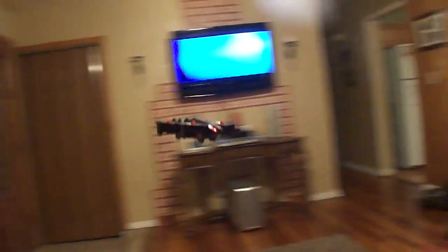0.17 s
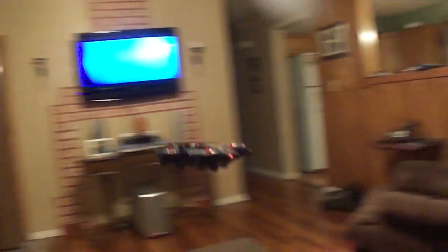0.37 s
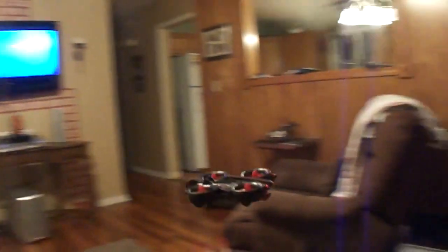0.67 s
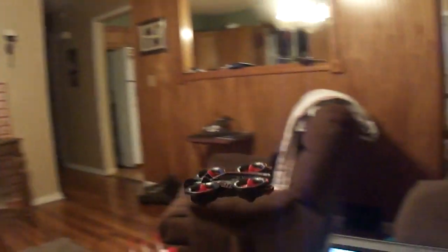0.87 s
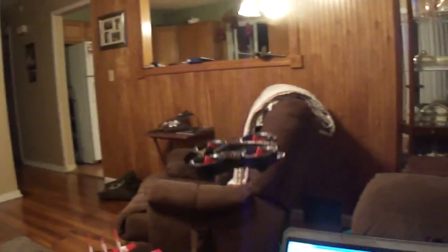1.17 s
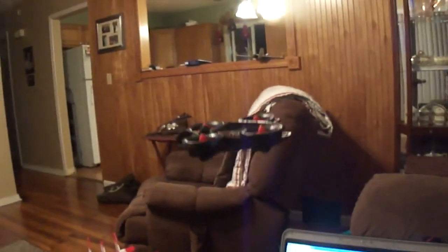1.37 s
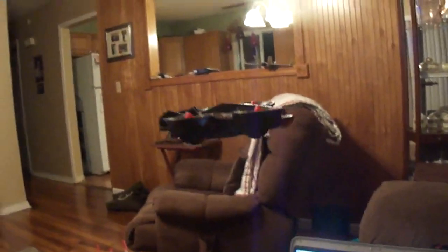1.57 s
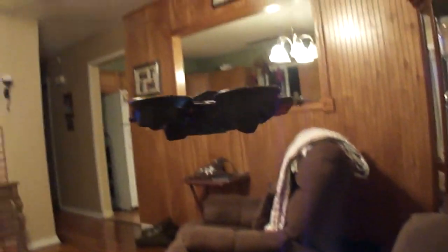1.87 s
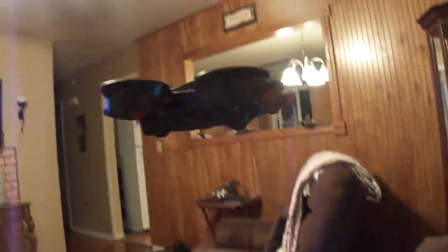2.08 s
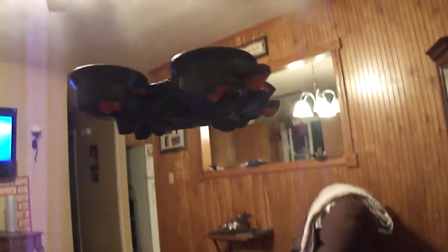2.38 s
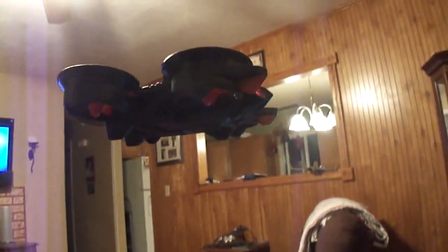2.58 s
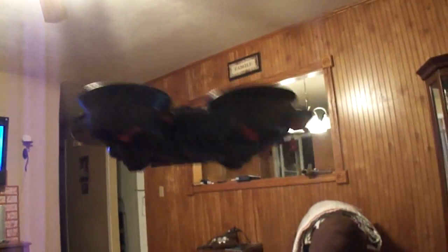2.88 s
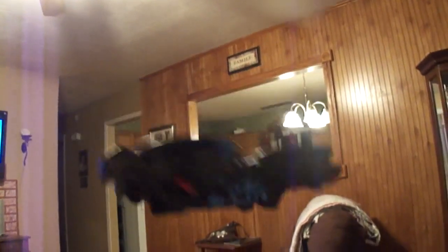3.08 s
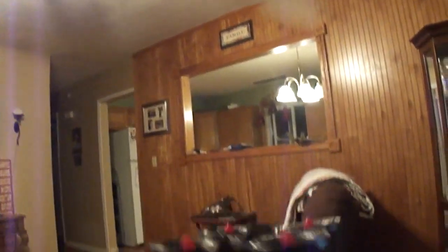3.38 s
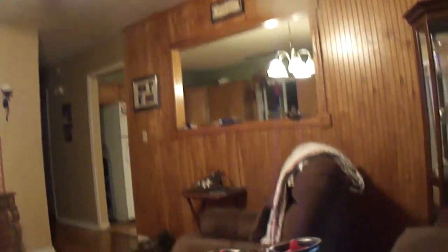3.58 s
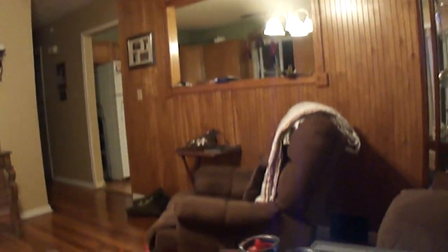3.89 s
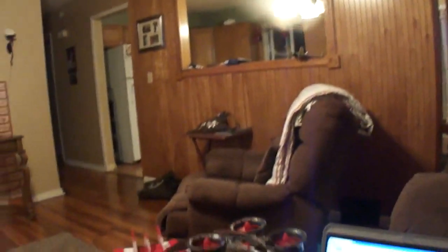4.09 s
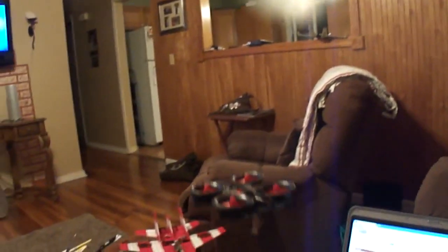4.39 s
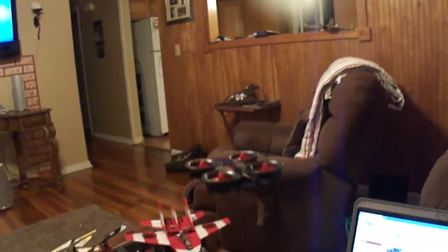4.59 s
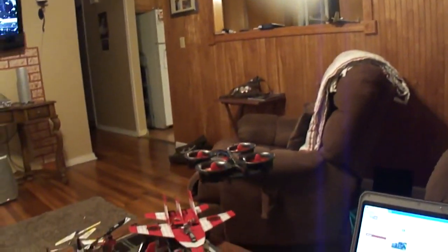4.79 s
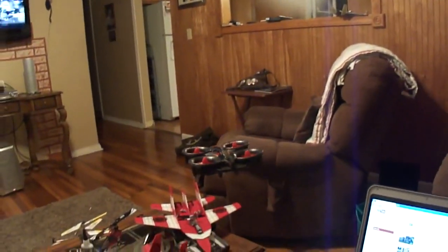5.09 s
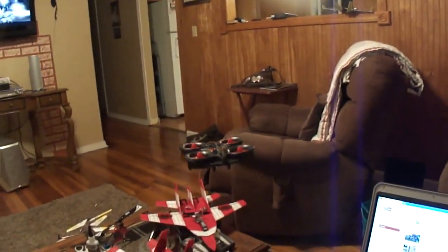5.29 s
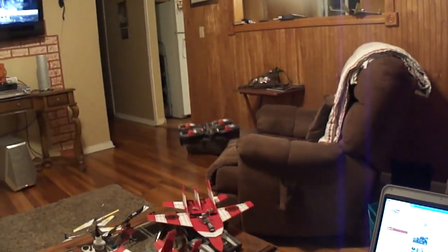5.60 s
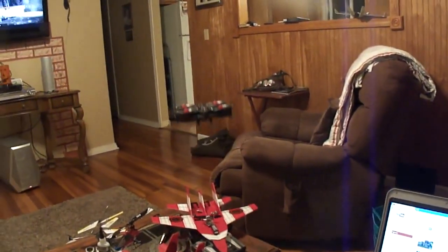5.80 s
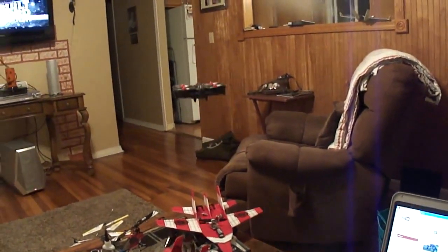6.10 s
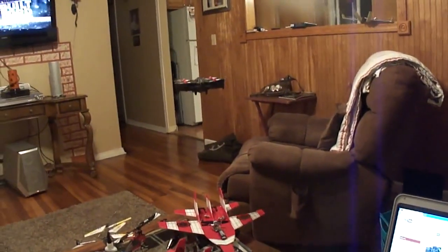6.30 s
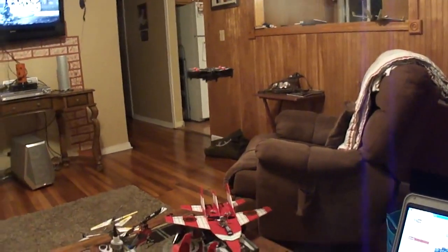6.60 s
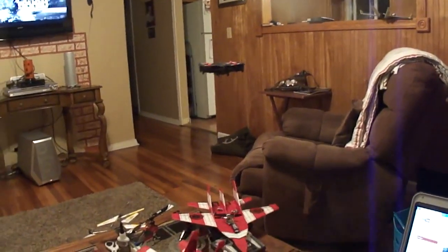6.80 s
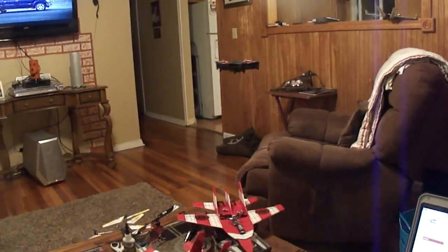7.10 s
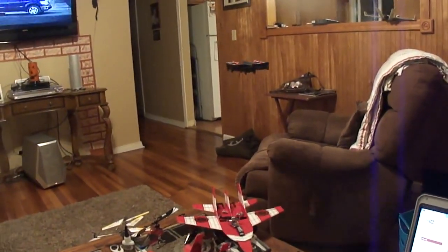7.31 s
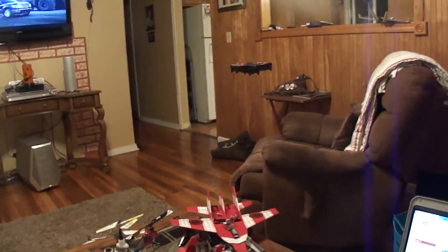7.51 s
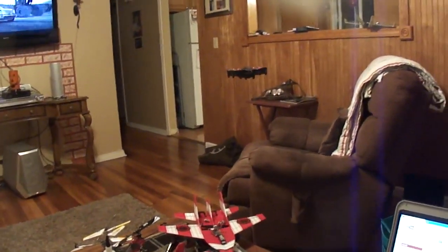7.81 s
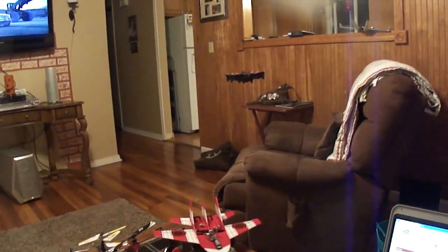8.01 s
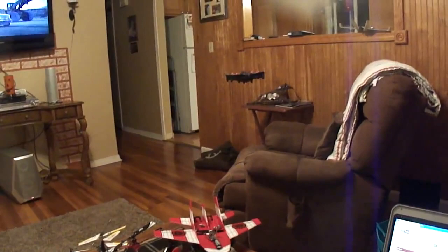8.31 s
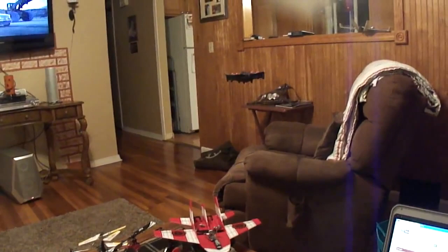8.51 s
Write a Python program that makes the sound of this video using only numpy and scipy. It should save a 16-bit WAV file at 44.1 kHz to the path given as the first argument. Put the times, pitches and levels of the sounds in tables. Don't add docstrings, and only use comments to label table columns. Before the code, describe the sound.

A small ducted quadcopter buzzes continuously through a furnished living room, already flying at the start. The sound is a dense, raspy, nasal drone with rough beating, airy propeller hiss, a hollow ringing from the ducts and a thin, fixed high motor whine. From 0 to 0.5 s the pitch dips, then rises by 0.7 s and wavers until 2.6 s. Around 2.7 to 3 s one rotor pair strains sharply upward while the other sags, then they recover. At 3.9 to 4.2 s both surge together, followed by wobbling corrections. From about 6 s it settles into a steadier, slightly more distant hover with small flutters and a little more faint low rumble. At 8.1 s the buzz abruptly softens behind a door edge, with a faint low panel hum, and continues to the end at about 8.6 s. Small camera microphone, short room reverberation, muted extreme treble, almost mono.

```python
import sys
import numpy as np
from scipy import signal
from scipy.fft import rfft, irfft, next_fast_len
from scipy.io import wavfile

SR = 44100
rng = np.random.default_rng(int(sys.argv[2]) if len(sys.argv) > 2 else 0)


def put_to_file(sound):
    columns = np.atleast_2d(sound).T
    safe = np.clip(columns, -1, 1)
    whole_steps = np.round(safe * 32767)
    wavfile.write(sys.argv[1], SR, whole_steps.astype(np.int16))


def makeup_ratio(level_db):
    decades = np.asarray(level_db, float) / 20
    return 10 ** decades


N = 381465


def rms_one(x):
    return x / np.sqrt(np.mean(x ** 2) + 1e-20)


def in_time(rows):
    s, *columns = np.transpose(rows)
    return [np.interp(np.arange(N) / SR, s, c) for c in columns]


def at_frequency(hz, rows):
    points = np.array(rows)
    return np.interp(np.log(hz), np.log(points[:, 0]), points[:, 1])


def drift(rate):
    r = np.exp(-80 * np.pi * rate / SR)
    noise = rng.standard_normal(N // 40 + 2002)
    slow = signal.lfilter([1], [1, -2 * r, r * r], noise)[2000:]
    return np.interp(np.arange(N) / 40, np.arange(len(slow)), rms_one(slow))


def turns(hz):
    return 2 * np.pi * (np.cumsum(hz) / SR + rng.random())


def tone(phase):
    return np.sqrt(2) * np.sin(phase)


def band_pass(x, order, low_hz, high_hz):
    return signal.sosfilt(signal.butter(order, [low_hz, high_hz], "band", fs=SR, output="sos"), x)


def resonance(x, hz, width_hz):
    r = np.exp(-np.pi * width_hz / SR)
    poles = [1, -2 * r * np.cos(2 * np.pi * hz / SR), r * r]
    once = signal.lfilter([1, 0, -1], poles, x)
    return rms_one(signal.lfilter([1, 0, -1], poles, once))


# (multiple of shaft speed [1], level [dB])
BLADE_ORDERS = [(2, -18.5), (4, -13.5), (5, -13), (6, -10), (7, -16), (8, -16.5), (9, -9), (10, -24.5),
                (11, -25.5), (12, -11), (14, -42), (15, -10), (17, -26), (18, -14), (21, -16), (24, -15.5),
                (27, -20.5)]
STRAIN_ORDERS = (5, 7, 12, 18)
STRAIN_FROM_HZ, STRAIN_DB_PER_OCTAVE = 370, 80


def rotor(hz, trim, shaft_db, blade_db, buzz_db, top_db):
    steady = turns(hz * (1 + trim + 0.0028 * drift(12)))
    shake = turns(hz * 0.0072 * drift(44.67))
    shaft = makeup_ratio(shaft_db + 1.5 * drift(12)) * tone(steady + 0.34 * shake)
    blade = makeup_ratio(blade_db + 2 * drift(25)) * tone(3 * (steady + 0.5 * shake))
    octaves_over = np.maximum(np.log2(hz * (1 + trim) / STRAIN_FROM_HZ), 0)
    strain = makeup_ratio(STRAIN_DB_PER_OCTAVE * octaves_over)
    gusts = [makeup_ratio(buzz_db + 4 * drift(70) + 2.5 * drift(1.5)) for _ in range(6)]
    buzz = 0
    for n, (order, db) in enumerate(BLADE_ORDERS):
        gain = makeup_ratio(db)
        if order > 11:
            gain = gain * makeup_ratio(top_db + 11)
        elif order == 2:
            gain = gain * (hz / 350) ** 6.4
        if order in STRAIN_ORDERS:
            gain = gain * strain
        phase = order * (steady + shake) + 2 * np.pi * rng.random()
        buzz = buzz + gain * gusts[n % 6] * tone(phase)
    return buzz, shaft + blade, steady


TWIN_SHAFT_DB, TWIN_BLADE_DB, TWIN_DB_PER_SPLIT = -13, -11, 2.5


def rotor_pair(hz, split, blade_db, shaft_db, buzz_db, top_db):
    buzz_db = buzz_db + 30 * np.log10(hz / 335)
    apart_db = TWIN_DB_PER_SPLIT * abs(split)
    twin_shaft_db = shaft_db + np.minimum(TWIN_SHAFT_DB + apart_db, -2)
    twin_blade_db = blade_db + np.minimum(TWIN_BLADE_DB + apart_db, -7)
    half_split = split / 200
    buzz, tones, phase = rotor(hz, 0.99 * half_split, shaft_db + 0.35, blade_db - 3, buzz_db, top_db)
    twin_buzz, twin_tones, _ = rotor(hz, -half_split, twin_shaft_db, twin_blade_db, buzz_db, top_db)
    return buzz + twin_buzz, tones + twin_tones, phase


# (time [s], shaft speed [Hz],
# split between its rotors [%], blade load [dB], shaft unbalance [dB])
FAST_PAIR = [(0, 345.3, 0.88, -21.5, -34.5), (.22, 333.4, 1.48, -22, -38.5), (.35, 344.5, 1.89, -24, -44),
             (.46, 335, 1.29, -28, -38.5), (.57, 348, 1.25, -26, -35.5), (.67, 366.2, 0.095, -15, -24),
             (.8, 364.4, .1, -17, -29.5), (.97, 371, 2.42, -17.5, -33), (1.16, 366, 3.63, -19.5, -29.5),
             (1.27, 353, 2.08, -28.5, -34), (1.36, 341.7, 1.48, -27, -37.5), (1.75, 347, 1.98, -26, -35),
             (2.0, 341.6, 2.42, -30, -40), (2.3, 339.6, 2.47, -31, -38.5),
             (2.58, 338.4, 2.46, -32.5, -38.5), (2.7, 367.3, 1, -20.5, -32), (2.8, 379.2, 1.08, -23, -26.5),
             (2.87, 389.7, 0.99, -26, -28), (2.93, 401, 0.98, -27.5, -32.5), (3.08, 373, 1.48, -27, -34),
             (3.3, 359.3, 1.06, -24.5, -48), (3.52, 367.8, 0.97, -20.5, -43),
             (3.76, 366.8, 0.97, -28.5, -39), (3.86, 380.6, 0.47, -21, -28.5),
             (4.0, 381.5, 0.515, -16, -31), (4.08, 374.8, 2.03, -23, -31), (4.2, 369.4, 2, -25.5, -22.5),
             (4.32, 363.6, 0.95, -21.5, -38), (4.43, 381, 5.8, -20.5, -36.5),
             (4.7, 372.5, 4.3, -21.5, -37.5), (4.9, 364.5, .6, -19.5, -39.5), (5.02, 367, 1.02, -25, -30),
             (5.17, 358.5, .5, -18, -34), (5.55, 361, .8, -26.5, -31.5), (5.7, 350, 1.68, -29, -35.5),
             (5.82, 344.4, 1.01, -27.5, -32), (5.93, 339.1, 1.47, -30, -39),
             (6.05, 332.9, 1.01, -32, -44), (6.8, 332, 0.59, -35, -45.5), (6.9, 332.6, .4, -24, -38),
              (6.98, 332.6, 0.41, -21, -37), (7.06, 332.7, 0.99, -41, -44), (7.14, 333, .4, -18.5, -49),
              (7.2, 333, 0.597, -36, -53), (7.27, 333.6, 0.41, -14.5, -41), (7.34, 333.5, 0.61, -26.5, -34),
              (7.4, 333, 0.64, -24, -44), (7.49, 333, 0.62, -20.5, -46), (7.56, 333, 1.04, -27, -42),
              (7.77, 336, 1.01, -24.5, -45), (7.95, 339, 2, -36, -52), (8.1, 340, 1.91, -28, -43),
              (8.2, 341, 2.44, -33.5, -33.5), (8.4, 343, 2.46, -33, -37.5), (8.65, 343, 2.6, -28, -32.5)]


def fast_motion():
    return in_time(FAST_PAIR)


# (time [s], shaft speed [Hz], split between its rotors [%], blade load [dB], shaft unbalance [dB])
SLOW_PAIR = [(0, 292, 3.7, -35, -58), (.25, 274.4, 4, -35, -60), (.42, 263.4, 2, -37, -44),
             (.55, 269.6, 3, -37, -53), (.65, 299, 4.5, -36, -51), (.9, 305.9, 4, -37, -42),
             (1.15, 330.3, 3, -30.5, -33.5), (1.5, 336.4, -1, -23, -41), (1.8, 331.4, -6.5, -35, -35.5),
             (2.05, 319.2, -9, -30, -39), (2.3, 310.8, -4, -32, -39), (2.58, 306, -2, -28.5, -39),
             (2.72, 262.2, 1.84, -30, -45), (2.82, 237, 2, -34.5, -52), (2.95, 222.1, 2, -38, -52),
             (3.1, 257.5, 4, -31, -44), (3.27, 279.8, 2, -30.5, -54), (3.38, 276.8, 2, -37, -42),
             (3.5, 272, 2, -30, -45), (3.82, 290.7, 1.58, -25.5, -48), (3.92, 323.9, 5, -22, -39),
             (4.01, 345, 14, -23, -35), (4.09, 362.2, 16, -22.5, -30), (4.17, 352.2, 15, -26, -32),
             (4.24, 340.4, 8, -22, -36), (4.32, 335, 1, -26, -35), (4.41, 303, 2.18, -31, -50),
             (4.52, 276.5, 2, -33, -52), (4.75, 279.6, 1.98, -38.5, -48), (5.0, 298.9, 1.74, -32, -48),
             (5.15, 310, 0.29, -22, -38.5), (5.4, 320.6, 1.5, -31, -51), (5.7, 342.2, 0.6, -24.5, -35),
             (5.9, 334.8, 2.2, -33, -43), (6.1, 320, 0.74, -26, -43), (6.45, 326.2, 0.73, -28.5, -53),
             (7.5, 331, 1.2, -34.5, -47), (7.9, 321.4, 1.3, -31.5, -52), (8.3, 325.2, 3, -31.5, -42),
             (8.6, 319, 1.4, -28, -46)]


def slow_motion():
    return in_time(SLOW_PAIR)


# (time [s], buzz by nearness [dB], fast pair orders [dB], slow pair orders [dB], whine by motor facing [dB])
FLIGHT = [(0, -25, -0.5, -3, -53), (.3, -24, -1.5, -6, -29.5), (.65, -23.5, -2, 3, -34.5),
          (1.0, -25, 1, -1, -34), (1.3, -26, 4, -5.5, -34), (1.62, -25.5, -1.5, 2, -37.5),
          (2.0, -23.5, -1, 1, -29.5), (2.25, -24, 2, 0.5, -30.5), (2.5, -23.5, -0.5, -2.5, -28.5),
          (2.75, -24, 0.5, 0.5, -27.5), (2.95, -23, -5.5, -10, -30), (3.1, -23.5, -2, -1, -35.5),
          (3.35, -23, -2.5, -3.5, -30), (3.8, -23, -2.5, -1.5, -46), (3.95, -23.5, -4, -1.5, -32),
          (4.1, -23.5, -9, 2.5, -36), (4.2, -24.5, 4, 0.5, -31), (4.3, -25.5, 1, -1, -34),
          (4.45, -25.5, -3.5, 1, -32.5), (4.86, -23.5, -1, -3, -39.5), (5.4, -25, -2, 0, -34.5),
          (5.75, -25, 0.5, -1.5, -31), (6.0, -25.5, 1.5, -4, -28.5), (6.2, -26.5, 3, -8, -29),
          (6.55, -25.5, 1, -6, -32.5), (6.9, -27, 3.5, -2, -29.5), (7.4, -27, 2.5, -2, -35),
          (7.8, -25.5, -0.5, -1.5, -35), (8.05, -25.5, -1, 1.5, -41), (8.6, -28, 3, 1, -36)]


def flight():
    return in_time(FLIGHT)


DROP_S, DROP_EDGE_S = 8.112, 0.0094
DROP_BUZZ_DB, DROP_DUCT_DB, DROP_RECOVER_DB_PER_S = -5, -8, 2.5


def late_drop():
    t = np.arange(N) / SR
    dropped = np.clip((t - DROP_S) / DROP_EDGE_S, 0, 1)
    return dropped, dropped * (DROP_BUZZ_DB + DROP_RECOVER_DB_PER_S * (t - DROP_S))


# (frequency [Hz], level [dB])
HISS = [(88, -75), (150, -49.5), (336, -14.5), (825, -16), (987, -6.5), (1820, -5.5), (1990, -11),
        (2470, -11.5), (2950, -8), (4380, -18.5), (5840, -10.5), (6500, -26.5), (9480, -11), (10900, -45),
        (14200, -71), (22000, -120)]
HISS_DB = -2.5
DUCT_HZ, DUCT_WIDTH_HZ, DUCT_DB = 1163, 236, -5
DUCT_LOAD_DB, DUCT_SWAY_DB = -5, 5.5


def rush(buzz_db, top_db, dropped):
    low_part, top_part = 0, 0
    edges = 110 * 2 ** np.arange(0, 7, 1 / 3)
    white = rng.standard_normal((3, N))
    for k, (low, high) in enumerate(zip(edges, edges[1:])):
        hz = np.sqrt(low * high)
        band = band_pass(white[k % 2], 2, low, high) * makeup_ratio(at_frequency(hz, HISS) + drift(12))
        if hz > 6000:
            top_part = top_part + band
        else:
            low_part = low_part + band
    broad = (low_part + makeup_ratio(top_db + 20) * top_part) / np.std(low_part)
    duct = resonance(white[2], DUCT_HZ, DUCT_WIDTH_HZ) + makeup_ratio(-13) * resonance(white[2], 1206, 37)
    duct_db = DUCT_DB + DUCT_LOAD_DB + DUCT_SWAY_DB * drift(1.4) + dropped * DROP_DUCT_DB
    return makeup_ratio(buzz_db + HISS_DB) * broad + makeup_ratio(buzz_db + duct_db) * duct


WHINE_HZ, WHINE_SPREAD_HZ = 5704, 7


def motor_whine(whine_db):
    whine = makeup_ratio(whine_db - 8) * resonance(rng.standard_normal(N), WHINE_HZ, 90)
    for _ in range(4):
        phase = turns(WHINE_HZ + WHINE_SPREAD_HZ * drift(9))
        whine = whine + makeup_ratio(whine_db - 11 + 3 * drift(40)) * tone(phase)
    return whine


WAKE_DB, WAKE_SWAY_DB = -15.5, -0.5
WAKE_DB_PER_OCTAVE = 1.5


def wake_mixing(fast_phase, slow_phase, load_db, octaves_apart):
    mix_db = load_db + WAKE_DB + WAKE_SWAY_DB * drift(32) + WAKE_DB_PER_OCTAVE * octaves_apart
    upper = makeup_ratio(mix_db + 3.5 + 2 * drift(4.2)) * tone(2 * fast_phase + slow_phase)
    lower = makeup_ratio(mix_db + 4.5 + 2.6 * drift(15)) * tone(fast_phase + 2 * slow_phase)
    return upper + lower


FRAME_ROCK_HZ, FRAME_ROCK_DB = 47.85, -47.5


def frame_rock(fast_phase, dropped):
    rock = turns(np.full(N, FRAME_ROCK_HZ))
    sidebands = tone(fast_phase + rock) + makeup_ratio(-10) * tone(fast_phase - rock)
    return dropped * makeup_ratio(FRAME_ROCK_DB + 3.78 * drift(5.2)) * sidebands


# (time [s], length [s], level [dB])
PANEL_HUMS = [
    (.2, .1, -48),
    (5.88, .14, -47),
    (8.24, .24, -46),
]
PANEL_HZ = 502


def panel():
    t = np.arange(N) / SR
    swell = 0
    for s, length, db in PANEL_HUMS:
        swell = swell + makeup_ratio(db) * np.sin(np.pi * np.clip((t - s) / length, 0, 1))
    return swell * tone(turns(PANEL_HZ + 3 * drift(2)))


ROOM_T60_S, WALL_CUT_HZ, ROOM_DB = 0.34, 6100, -13
TONE_ROOM_DB = -7.5


def living_room(x):
    out, dull = np.zeros(N), np.exp(-2 * np.pi * WALL_CUT_HZ / SR)
    lags = (rng.uniform(0.015, 0.045, 10) * SR).astype(int)
    for k, lag in enumerate(lags):
        loop, state = x.copy(), [0.]
        gain = makeup_ratio(-60 * lag / SR / ROOM_T60_S)
        for i in range(lag, N, lag):
            back, state = signal.lfilter([gain * (1 - dull)], [1, -dull], loop[i - lag:i], zi=state)
            loop[i:i + lag] += back[:N - i]
        out += (loop - x) * (-1) ** k
    return out


RUMBLE_DB, RUMBLE_RISE_DB, RUMBLE_RISE_S = -64.5, 8.5, 5.9


def rumble():
    rumble_db = RUMBLE_DB + RUMBLE_RISE_DB * (np.arange(N) / SR > RUMBLE_RISE_S)
    noise = band_pass(rng.standard_normal(N), 2, 70, 190)
    return makeup_ratio(rumble_db - 9 + 10 * drift(9)) * rms_one(noise)


BUZZ_DB = -6
TOP_DB, TOP_DB_PER_OCTAVE = -13.5, -16.5


def scene():
    dropped, drop_db = late_drop()
    buzz_db, fast_orders_db, slow_orders_db, whine_db = flight()
    buzz_db = buzz_db + drop_db
    fast_hz, fast_split, fast_load_db, fast_shaft_db = fast_motion()
    slow_hz, slow_split, slow_load_db, slow_shaft_db = slow_motion()
    top_db = TOP_DB + TOP_DB_PER_OCTAVE * np.log2(fast_hz / 340)
    fast_buzz_db = buzz_db + fast_orders_db + BUZZ_DB
    slow_buzz_db = buzz_db + slow_orders_db + BUZZ_DB + 0.5
    fast, fast_tones, fast_phase = rotor_pair(
        fast_hz, fast_split, fast_load_db, fast_shaft_db, fast_buzz_db, top_db)
    slow, slow_tones, slow_phase = rotor_pair(
        slow_hz, slow_split, slow_load_db, slow_shaft_db, slow_buzz_db, top_db)
    load_db = (fast_load_db + slow_load_db) / 2
    wakes = wake_mixing(fast_phase, slow_phase, load_db, np.log2(fast_hz / slow_hz))
    drone = fast + slow + wakes + motor_whine(whine_db)
    tones = fast_tones + slow_tones
    direct = drone + tones + rush(buzz_db, top_db, dropped) + frame_rock(fast_phase, dropped)
    reverberant = makeup_ratio(ROOM_DB) * living_room(drone + makeup_ratio(TONE_ROOM_DB) * tones)
    heard = direct + reverberant + panel() + rumble()
    return np.array([heard, heard])


def band_limit(x):
    return signal.sosfilt(signal.butter(12, 11090, fs=SR, output="sos"), x)


# (frequency [Hz], level
# [dB])
MICROPHONE = [(30, -37), (90, -11.5), (200, -2), (410, -1.5), (480, -7), (580, 0), (5700, -1), (6400, -8.5),
              (8600, -10), (9300, -4), (10200, -10.5), (10950, -16.5), (11080, -32)]


def record(dry):
    size = next_fast_len(N + 4096)
    hz = np.maximum(np.arange(size // 2 + 1) * SR / size, 1)
    mid = irfft(rfft(dry[0], size) * makeup_ratio(at_frequency(hz, MICROPHONE)), size)[:N]
    later = np.roll(mid, 997)
    treble = band_pass(later, 5, 3700, 10300)
    bass = signal.sosfilt(signal.butter(2, 800, "low", fs=SR, output="sos"), later)
    mismatch = makeup_ratio(-23) * np.clip(drift(12), 0, 2) * treble
    mismatch = mismatch + makeup_ratio(-42) * np.clip(drift(12), 0, 2) * bass
    mismatch = mismatch + makeup_ratio(-15) * band_pass(later, 4, 70, 180)
    return band_limit(mid + mismatch * [[1], [-1]])


dry = scene()
out = record(dry)
put_to_file(out)
```